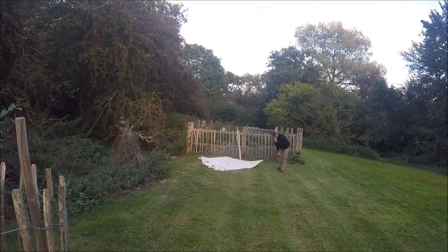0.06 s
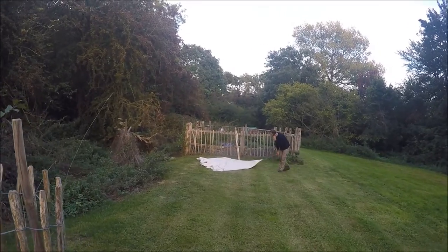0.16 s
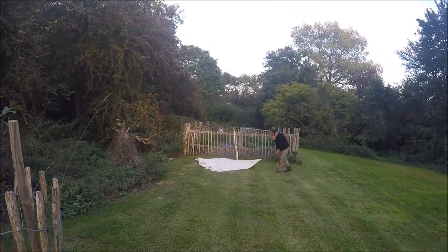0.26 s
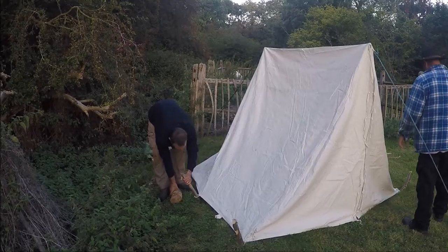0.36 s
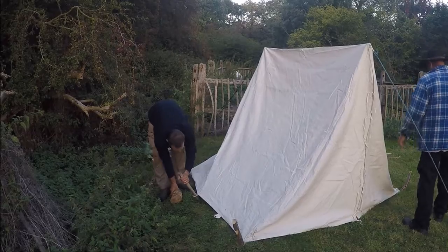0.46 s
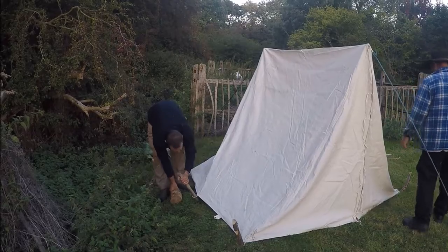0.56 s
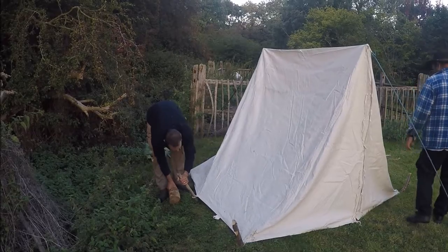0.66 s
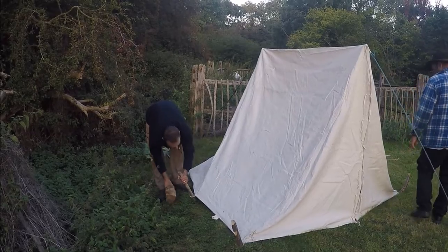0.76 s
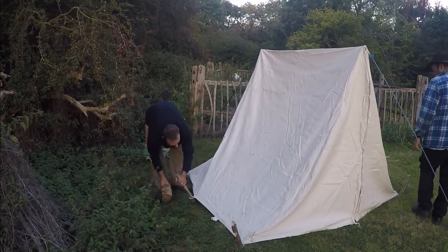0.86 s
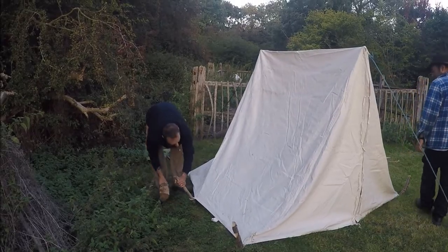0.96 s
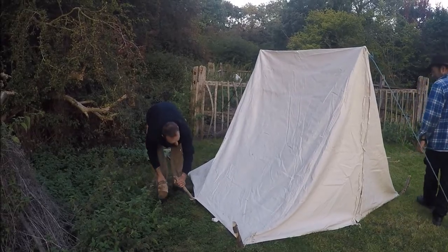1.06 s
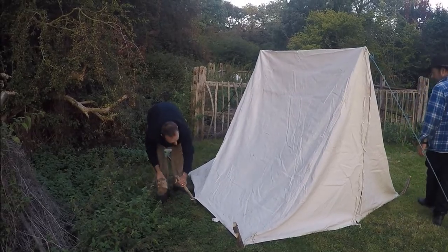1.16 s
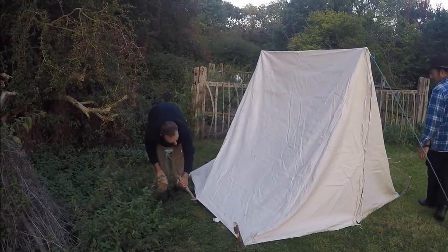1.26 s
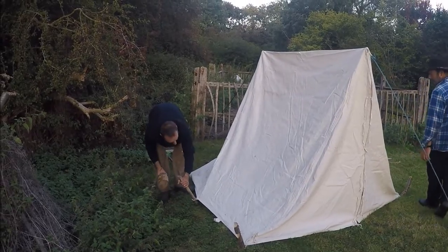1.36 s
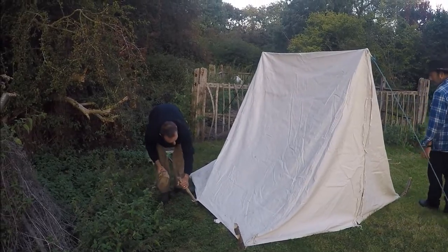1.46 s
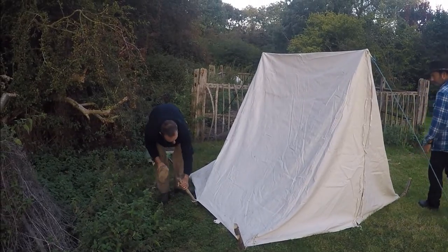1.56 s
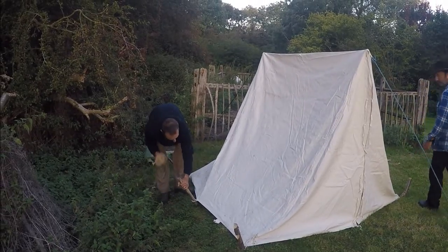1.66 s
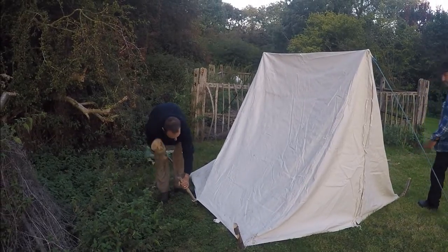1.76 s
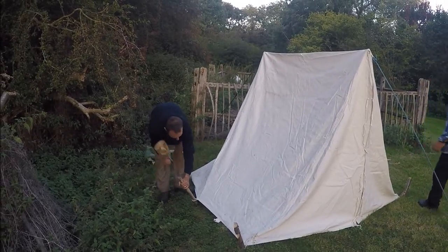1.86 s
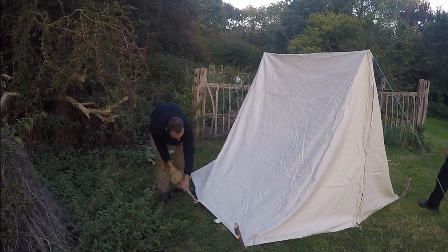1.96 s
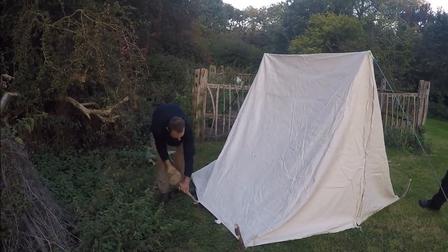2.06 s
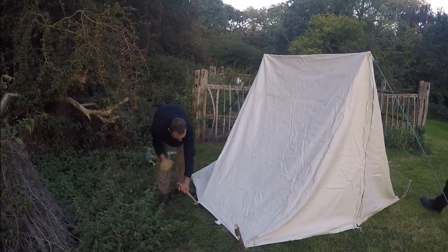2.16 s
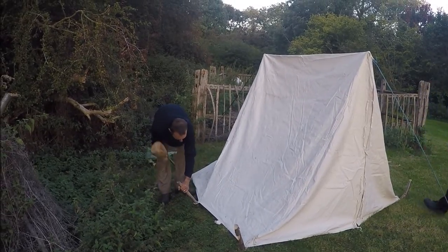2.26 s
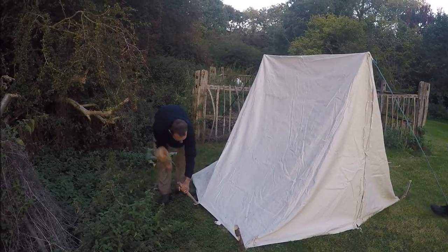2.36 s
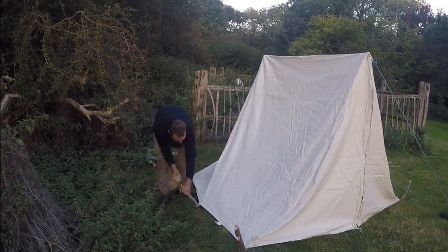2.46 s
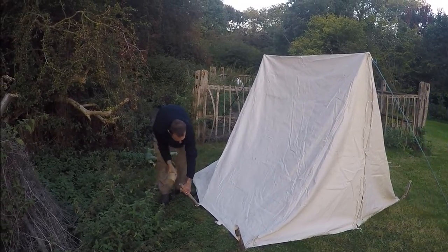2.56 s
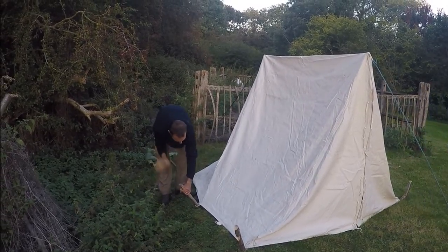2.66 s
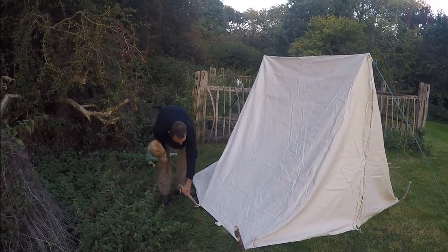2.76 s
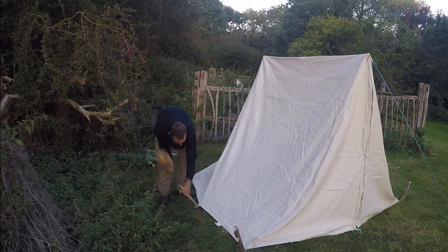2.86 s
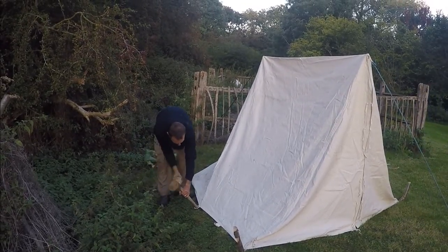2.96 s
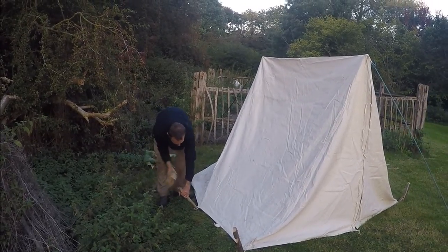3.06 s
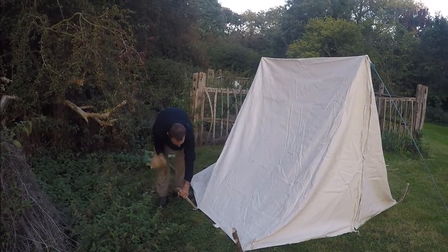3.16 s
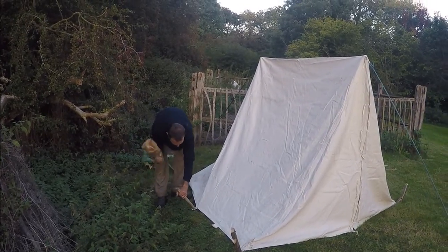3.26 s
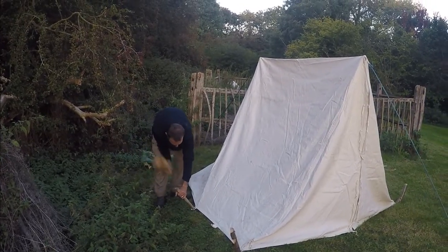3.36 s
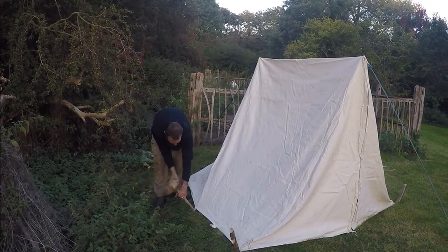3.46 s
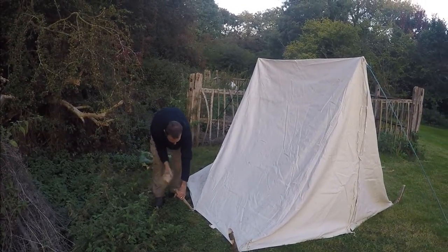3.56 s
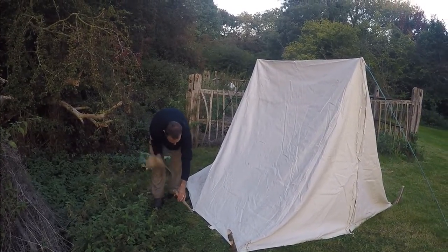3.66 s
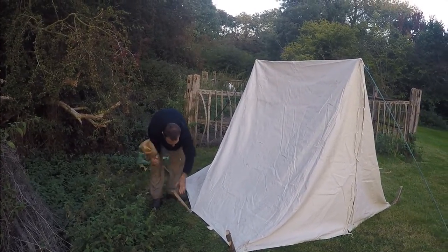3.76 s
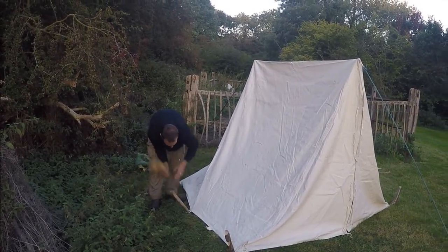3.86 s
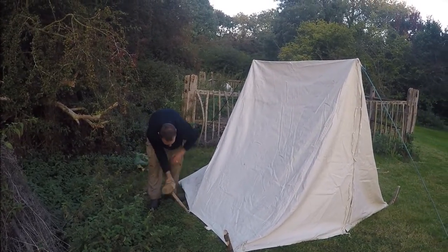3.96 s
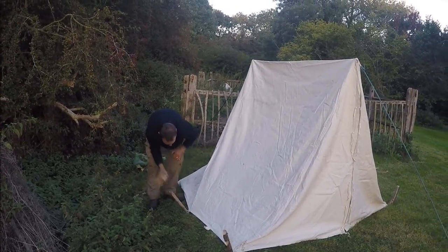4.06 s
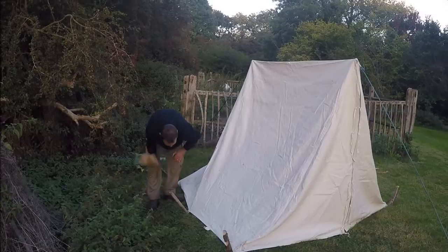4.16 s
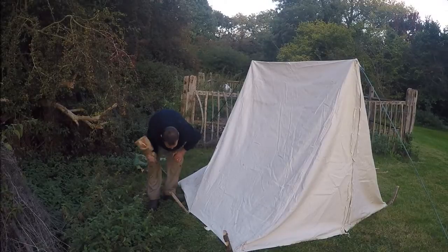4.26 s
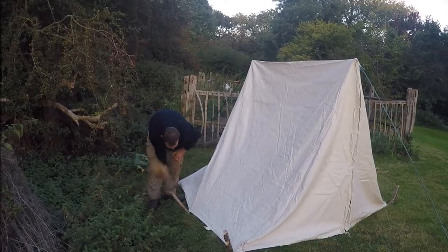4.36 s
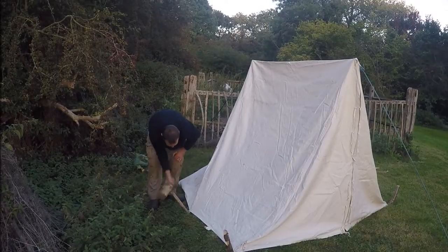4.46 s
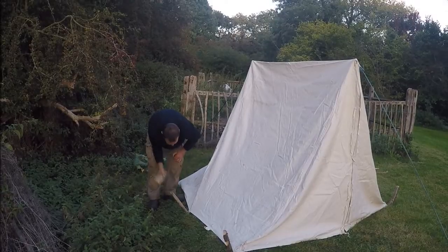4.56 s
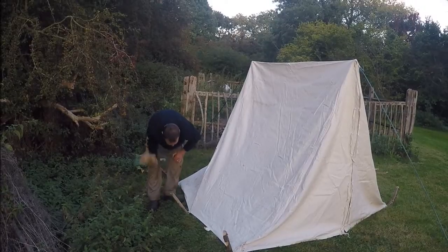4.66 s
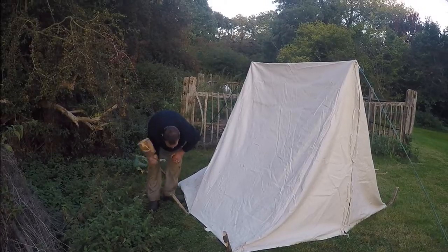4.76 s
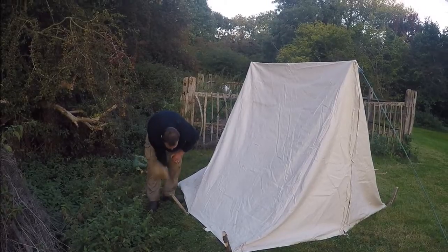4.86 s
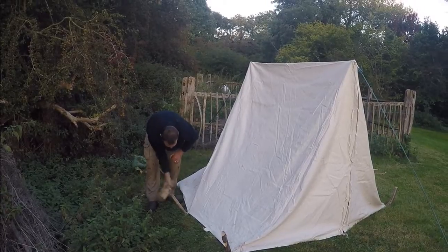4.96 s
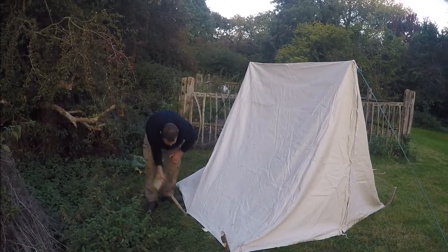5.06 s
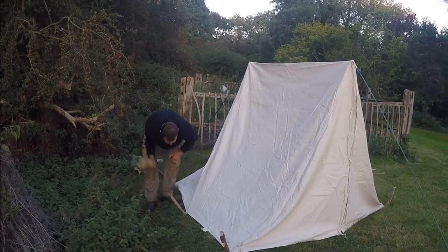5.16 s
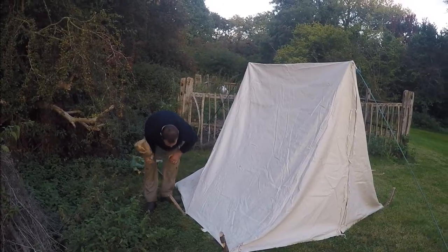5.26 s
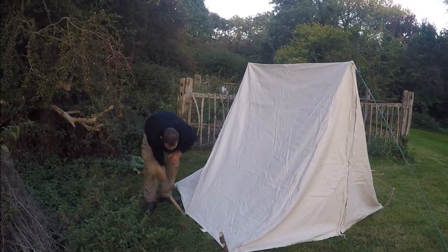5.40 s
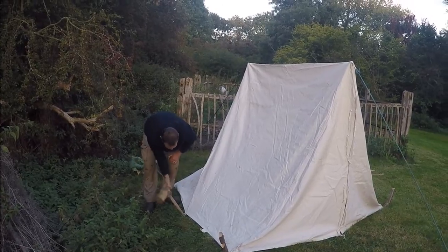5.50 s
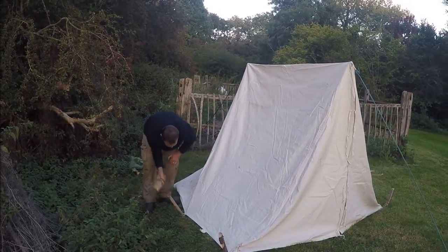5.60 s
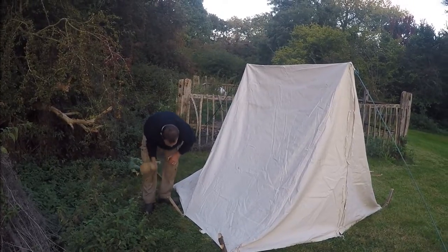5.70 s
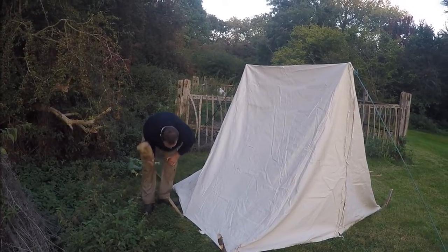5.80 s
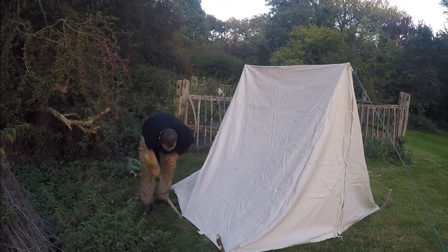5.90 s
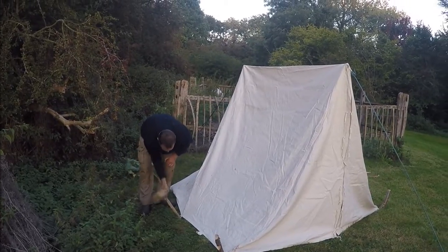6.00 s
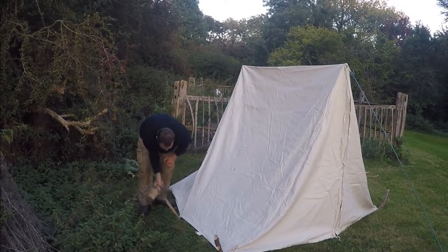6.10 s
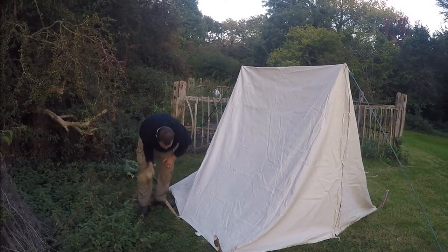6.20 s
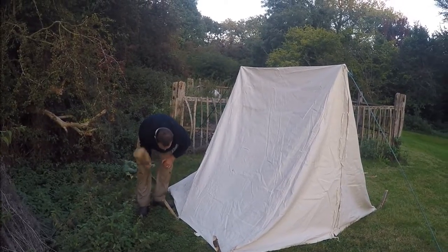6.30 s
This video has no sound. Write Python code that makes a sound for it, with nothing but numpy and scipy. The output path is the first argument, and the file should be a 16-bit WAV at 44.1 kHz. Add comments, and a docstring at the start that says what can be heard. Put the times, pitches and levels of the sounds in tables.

```python
"""Faint outdoor air fades to silence and cuts back in: low wind, a distant hum and engine, light rustling.
On a lawn, a wooden mallet drives a tent peg: a few light, woody blows, then firm hollow knocks as the
peg bites. Each blow rings peg and mallet head and thuds into the turf. Loose wood clacks close to the
microphone, twice barely audible and twice clearly. Far off an animal hoots twice, and the trees ring on."""
import sys
import numpy as np
from scipy import signal
from scipy.fft import rfft, irfft
from scipy.io import wavfile

SR = 44100
rng = np.random.default_rng(int(sys.argv[2]) if len(sys.argv) > 2 else 0)


def materialize(psi):
    """Save the field psi as 16-bit PCM at rate SR to the path in sys.argv[1].

    A 1-D psi becomes a single channel; in a 2-D psi each row is a channel.
    """
    bounded = np.clip(np.atleast_2d(psi).T, -1, 1)
    quanta = np.round(bounded * 32767).astype(np.int16)
    wavfile.write(sys.argv[1], SR, quanta)


N = 279390


def amp(db):
    """Decibels to gain."""
    return 10 ** (np.asarray(db) / 20)


def unit_rms(x):
    """Scales to rms 1."""
    return x / np.sqrt(np.mean(x ** 2) + 1e-20)


def burst(x):
    """Scales a short sound to the energy of a fiftieth of a second at rms 1."""
    return x / np.sqrt(np.sum(x ** 2) * 50 / SR + 1e-20)


def gain_at(spectrum, hz):
    """Gain of a spectrum of (Hz, dB) points, read on a log-frequency axis."""
    points_hz, db = np.transpose(spectrum)
    return amp(np.interp(np.log(hz + 1), np.log(points_hz + 1), db))


def add(mix, s, sound):
    """Mixes a sound in at s seconds."""
    part = mix[max(round(s * SR), 0):][:len(sound)]
    part += sound[:len(part)]


def noise(spectrum):
    """Steady noise of a given colour, at rms 1."""
    hz = np.fft.rfftfreq(N, 1 / SR)
    return unit_rms(irfft(rfft(rng.standard_normal(N)) * gain_at(spectrum, hz), N))


def drift(rate_hz):
    """Random wavering of rms 1, mostly slower than rate_hz."""
    hz = np.fft.rfftfreq(N, 1 / SR)
    return unit_rms(irfft(rfft(rng.standard_normal(N)) * np.exp(-(hz / rate_hz) ** 2), N))


def colour(x, spectrum, size=2048):
    """Minimum-phase filter: nothing sounds before the hit."""
    log_gain = np.log(gain_at(spectrum, abs(np.fft.fftfreq(size, 1 / SR))))
    response = np.fft.ifft(np.exp(np.conj(signal.hilbert(log_gain)))).real
    return signal.fftconvolve(x, response[:size // 2])[:len(x)]


def scatter(x, t60, onset_s, spectrum):
    """Countless small reflections that swell and die away."""
    t = np.arange(min(len(x), 2 * SR)) / SR
    onset = 1 - np.exp(-(t / onset_s) ** 2)
    tail = rng.standard_normal(len(t)) * np.exp(-np.log(1000) * t / t60) * onset
    return signal.fftconvolve(x, colour(tail / np.linalg.norm(tail), spectrum))[:len(x)]


# The bed of the place: low wind, distant hum, leaves. Each row: frequency in Hz, relative level in dB.
WIND_SPECTRUM = [(10, -17), (25, -7), (47, 0), (58, 0.5), (70, -12.5), (84, -16), (110, -15.5), (160, -25),
                 (400, -41.5), (1000, -70.5)]
HUM_SPECTRUM = [(60, -11), (170, -7.5), (280, -9.5), (400, -10), (600, -8), (820, 0.5), (1050, -.5),
                (1250, -5), (1400, -12), (1750, -14.5), (2100, -22.5), (3050, -21.5), (3500, -31),
                (8000, -45)]
LEAF_SPECTRUM = [(800, -24), (2500, -5), (3100, 1.5), (3500, -1.5), (4600, 1.5), (6000, -6.5),
                 (7500, -10.5), (10600, -9.5), (12000, -16), (14500, -13), (16000, -28)]

def air():
    """Wind, far-off hum and an engine slowly grow behind stirring leaves and a thin electronic whine."""
    t = np.arange(N) / SR
    swell = amp(0.77 * np.maximum(t - 1.98, 0))  # steady at first, then 0.77 dB a second
    wind = amp(-52 + 0.256 * drift(6)) * noise(WIND_SPECTRUM)
    hum = amp(-51.5 + 0.5 * drift(3.6)) * noise(HUM_SPECTRUM)
    engine_hz = 63.6 + 1.15 * t
    engine = amp(-55 + 1.15 * drift(6)) * unit_rms(np.sin(2 * np.pi * np.cumsum(engine_hz) / SR))
    leaves = amp(-73 + 0.44 * drift(25)) * noise(LEAF_SPECTRUM)
    whine_hz = 8640 + 4 * drift(18)
    whine = amp(-88) * unit_rms(np.sin(2 * np.pi * np.cumsum(whine_hz) / SR))
    return swell * (wind + hum + engine) + leaves + whine


def air_fader(fade_from_s=0.086, silent_s=0.37, cut_in_s=0.494):
    """Gain of the air: a quiet opening fades to silence, then it cuts in at full level."""
    t = np.arange(N) / SR
    opening = amp(-20) * np.clip((silent_s - t) / (silent_s - fade_from_s), 0, 1)
    return opening + np.clip((t - cut_in_s) / 0.0037, 0, 1)


# Canvas and grass brushing, faint at the microphone. Each row: frequency in Hz, relative level in dB.
CANVAS_SPECTRUM = [(1500, 7), (3200, 6), (4600, 4.5), (5600, -2.5), (7500, -12.5), (10000, -6), (11000, -4),
                   (12200, -26), (15000, -13)]
# The brushes. Each row: start in seconds, length in seconds, level in dB, tilt in dB per octave.
BRUSHES = [(.52, 0.48, -69.5, 0.5), (1.575, 0.63, -67.5, -2.5), (3.822, 0.57, -71, -0.5)]

def rustles(edge_s=0.1):
    """Canvas and grass brush now and then, swelling and dying away in uneven grains."""
    t, out = np.arange(N) / SR, np.zeros(N)
    for s, length, db, tilt_db in BRUSHES:
        level = amp(db) * np.clip(np.minimum(t - s, s + length - t) / edge_s, 0, 1)
        out += level * noise([(hz, band_db + tilt_db * np.log2(hz)) for hz, band_db in CANVAS_SPECTRUM])
    grains = amp(2.7 * drift(60))
    return out * grains


# An animal far off among the trees.
# Each row: start in seconds, time to the peak in seconds, top pitch in Hz, peak level in dB.
HOOT_CALLS = [(4.424, .076, 806, -28), (5.493, 0.069, 770.7, -30)]

def hoots(attack_s=0.031, swell_db_per_s=88, release_db_per_s=518):
    """A nearly pure tone with a slight rasp scoops upward and lingers among the trees."""
    calls = np.zeros(N)
    waver = drift(93)
    rasp = noise([(300, -24.5), (700, 8), (1200, 4), (2000, -9.5),
                  (2600, -17), (4000, -24.5), (9000, -53)])
    for s, peak_s, top_hz, db in HOOT_CALLS:
        t = np.arange(0, 2 * peak_s, 1 / SR)
        hz = top_hz * (1 - 0.3576 * np.exp(-t / 0.02204))  # scoops up from about a third below
        below_peak_db = np.maximum(swell_db_per_s * (peak_s - t), release_db_per_s * (t - peak_s))
        level = np.minimum(t / attack_s, 1) ** 1.1 * amp(db - below_peak_db)
        phase = 2 * np.pi * np.cumsum(hz * (1 + 0.0087 * waver[:len(t)])) / SR
        tone = np.sin(phase) + amp(-34.5) * np.sin(2 * phase) + amp(-44) * np.sin(3 * phase)
        add(calls, s, level * (unit_rms(tone) + amp(-17) * rasp[:len(t)]))
    return calls + scatter(calls, t60=1.12, onset_s=0.034, spectrum=[(500, -5.5), (780, -6), (2400, 4)])


# Ground, tent and fence, as the microphone hears them. Each row: delay in seconds, relative level in dB.
NEAR_ECHOES = [(.0068, -21.5), (.0178, -40), (.0285, -19.5), (.0415, -22)]

def garden(x, wet_db):
    """Direct sound, a few dull echoes, a splash off nearby shrubs and a faint tail from the trees."""
    echoes = np.zeros(len(x))
    dulled = colour(x, [(100, -23), (900, 0.5), (3000, -11.5), (12000, -4.5)])
    for delay, db in NEAR_ECHOES:
        add(echoes, delay, amp(db) * dulled)
    shrubs = scatter(x, t60=0.077, onset_s=0.0042, spectrum=[
        (100, -16), (400, -15.5), (850, -23), (1700, -18.5), (3300, -23.5), (8000, -29), (15000, -22)])
    trees = scatter(x, t60=0.62, onset_s=0.029, spectrum=[
        (100, -29), (850, -32.5), (3000, -36), (12000, -28)])
    return x + amp(wet_db) * (echoes + shrubs + trees)


def ring(modes, pitch, rise_s, detune):
    """Damped modes of alternating sign, tuned by the factor pitch; each hit lands on a different spot."""
    t, out = np.arange(SR // 2) / SR, 0
    for k, (hz, db, t60) in enumerate(modes):
        spot_db, shift = rng.uniform(-1.4, 1, 2)
        wave = np.sin(2 * np.pi * hz * pitch * (1 + detune * shift) * t)
        out += (-1) ** k * amp(db + spot_db) * np.exp(-np.log(1000) * t / t60) * wave
    return burst(out * (1 - np.exp(-(t / rise_s) ** 2)))


def crack(spectrum, decay_s):
    """Wood fibres crush in a brief spray of noise."""
    t = np.arange(SR // 2) / SR
    return burst(colour(rng.standard_normal(len(t)) * np.exp(-t / decay_s), spectrum))


# A stick close to the microphone. Each row: untuned mode in Hz, relative level in dB, t60 in seconds.
STICK_MODES = [(580, -12.5, 0.039), (983, -9.5, 0.034), (1420, 3.5, 0.014), (2185, -8.5, 0.0071),
               (3180, -1, 0.0078), (4150, -13.5, 0.029)]
# Its snap. Each row: frequency in Hz, relative level in dB.
SNAP_SPECTRUM = [(400, -22), (2400, -7), (3100, 1.5), (3900, 4.5), (4500, -2), (5300, -5.5), (6400, -14),
                 (8000, -32), (9600, -26), (12000, -40), (15000, -47)]
# Its clacks. Each row: start in seconds, body and snap levels in dB before their trims.
STICK_HITS = [(0.66, -63, -61.5), (1.637, -67, -63), (2.0133, -40.5, -59), (4.3356, -32.5, -33.5)]

def clacks():
    """Loose wood knocks lightly, close by: bright, dry and with no thud."""
    out = np.zeros(N)
    for s, body_db, snap_db in STICK_HITS:
        body = amp(body_db + 0.2) * ring(STICK_MODES, pitch=0.96, rise_s=0.00061, detune=0.008)
        snap = amp(snap_db - 0.8) * crack(SNAP_SPECTRUM, decay_s=0.0017)
        add(out, s, garden(body + snap, wet_db=-8))
    return out


# Soil and grass along the sinking peg. Each row: frequency in Hz, relative level in dB.
SOIL_SPECTRUM = [(400, 1), (1500, 9.5), (3000, 3.5), (4600, 0), (6500, -6), (8000, -7), (11000, -14.5),
                 (15000, -22)]

def scrape(decay_s):
    """The peg slides a little way into the ground and sticks."""
    age = np.arange(SR // 2) / SR / decay_s
    friction = rng.standard_normal(len(age)) * np.sqrt(age) * np.exp(-age)
    return burst(colour(friction, SOIL_SPECTRUM))


# The lawn under the peg. Each row: untuned mode in Hz, relative level in dB, t60 in seconds.
TURF_MODES = [(101.8, -6.5, 0.11), (290.7, 5, 0.021)]

def thud(pitch, rise_s, detune):
    """The turf gives way and rings low and briefly."""
    return ring(TURF_MODES, pitch, rise_s, detune)


def slip(start_s=5.6907):
    """After a hard blow the peg slips once more: a soft thud and a short scrape."""
    out = np.zeros(N)
    turf = amp(-47) * thud(pitch=1.22, rise_s=0.0014, detune=0.04)
    soil = amp(-56) * scrape(decay_s=0.0065)
    add(out, start_s, garden(turf + soil, wet_db=-6))
    return out


def slap(width_s):
    """The single pressure pulse of two faces meeting."""
    age = np.arange(SR // 2) / SR / width_s
    return burst(age ** 2 * (age - 3) * np.exp(-age))


# Mallet head and tent peg. Each row: untuned mode in Hz, relative level in dB, t60 in seconds.
HEAD_MODES = [(586, -5, 0.018), (851.4, 3, 0.023), (1026, -1.5, 0.018)]
PEG_MODES = [(1260, 1.5, 0.02), (1587, -2.5, 0.029), (1856, 4.5, .018), (2000, -6.5, 0.016),
             (2550, -4, 0.011), (3170, -5, 0.017), (4104, -3, 0.0083), (4290, -7, 0.0083),
             (5870, -14.5, 0.0058)]
# The crack of wood on wood. Each row: frequency in Hz, relative level in dB.
CRACK_SPECTRUM = [(500, -2.5), (2000, 10.5), (4000, 2), (4700, -14), (5600, 2), (6600, 0), (7700, -11),
                  (8800, -6), (11000, -8.5), (12500, -17), (15500, -13)]
# The blows on the lawn, foremost at the microphone. Each row: start in seconds, force in dB, glance from
# 0 (square) to 1 (off the edge), crack in dB relative to the force, pitch factor of head and turf,
# pitch factor of the peg, tilt of the peg in dB per octave.
MALLET_BLOWS = [(2.1579, -43.5, 0.045, -11.5, 1.07, 0.96, 3), (2.6306, -35.5, 1, -11.5, 0.9, 1.32, -3),
                (3.1199, -30.5, 0.81, -9, 0.93, 1.31, 0), (3.6132, -34.5, 0.35, -15.5, 0.94, 0.92, 4),
                (4.11, -31.5, 0.06, -11.5, 0.94, .98, -5), (4.6226, -30, 0.06, -5.5, .97, 1.01, 2),
                (5.1222, -30.5, 0, -8, 0.971, 1.024, 0), (5.6476, -29.5, 0, -14, 0.99, 1.004, 0),
                (6.1829, -31, 0, -10, 0.97, 0.97, 0.5)]

def mallet(rebound_s=0.015, bite_db_per_blow=2):
    """The faces crack and slap, the peg rings, the head knocks, the turf thuds and the soil scrapes."""
    out = np.zeros(N)
    for count, (s, force_db, glance, crack_db, head_pitch, peg_pitch, tilt_db) in enumerate(MALLET_BLOWS):
        # The spot struck favours the peg's high or low modes.
        modes = [(hz, db + tilt_db * np.log2(hz / PEG_MODES[0][0]), t60) for hz, db, t60 in PEG_MODES]
        contact = amp(crack_db) * crack(CRACK_SPECTRUM, decay_s=0.0027) + amp(-2) * slap(width_s=0.00013)
        peg = amp(-1.7) * ring(modes, peg_pitch, rise_s=0.00028, detune=0.041)
        knock = amp(9 - 12.5 * glance) * ring(HEAD_MODES, head_pitch, rise_s=0.0013, detune=0.0044)
        turf = amp(-1.5 - 7 * glance) * thud(head_pitch, rise_s=0.0019, detune=0.027)
        blow = contact + peg + knock - turf  # minus: the ground gives way
        # The loose peg springs softly back against the mallet, less each time as it bites.
        rebound = ring(PEG_MODES[:2], pitch=0.87, rise_s=0.00094, detune=0.078)
        add(blow, rebound_s, amp(-8 - bite_db_per_blow * count) * rebound)
        blow += amp(-21) * scrape(decay_s=0.025)
        add(out, s, amp(force_db) * garden(blow, wet_db=-1))
    return out


def scene():
    """The lawn and its surroundings at one microphone."""
    return (mallet() + slip() + clacks() + hoots() + rustles() + air() * air_fader())[None]


def record(dry):
    """The recorder passes nothing above its band limit."""
    band_limit_hz = 15600
    lowpass = signal.firwin(511, band_limit_hz, window=("kaiser", 9), fs=SR)
    return signal.oaconvolve(dry, lowpass[None], "same")


dry = scene()
out = record(dry)
materialize(out)
```